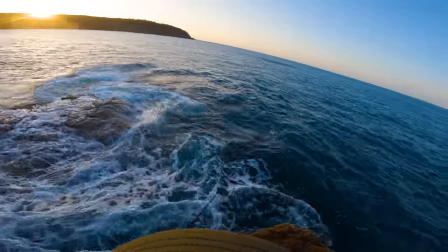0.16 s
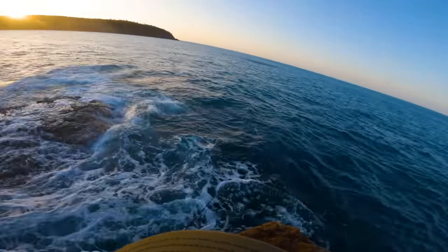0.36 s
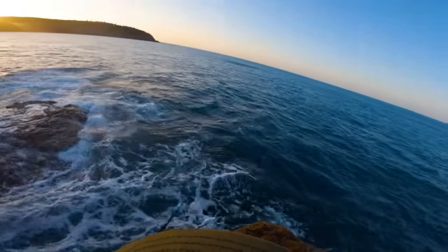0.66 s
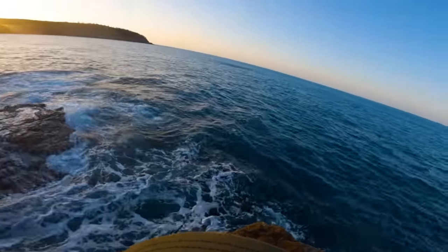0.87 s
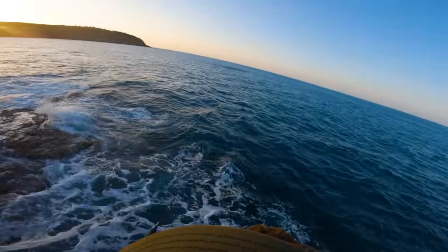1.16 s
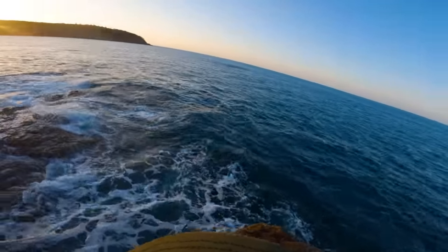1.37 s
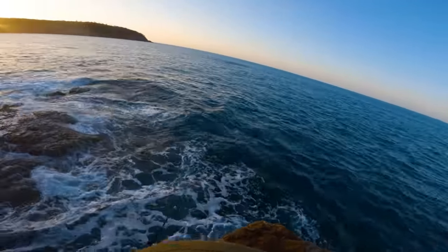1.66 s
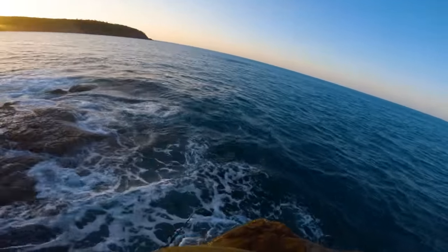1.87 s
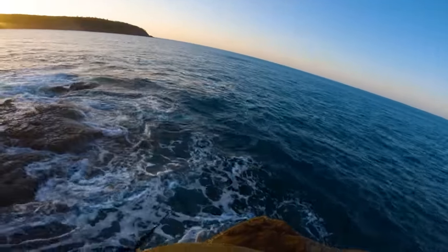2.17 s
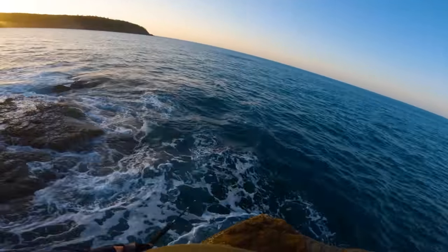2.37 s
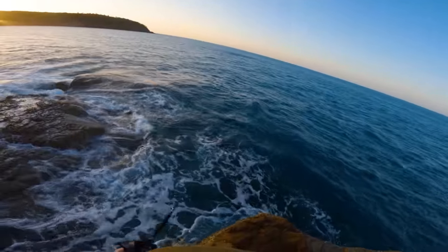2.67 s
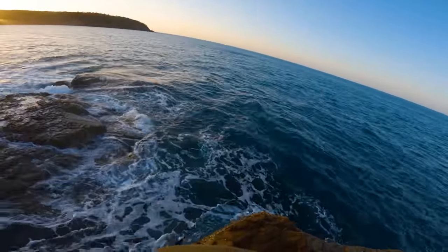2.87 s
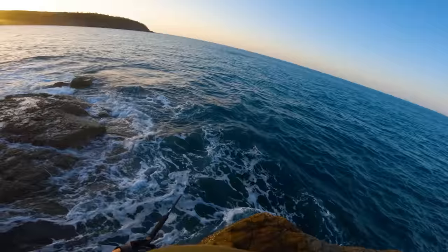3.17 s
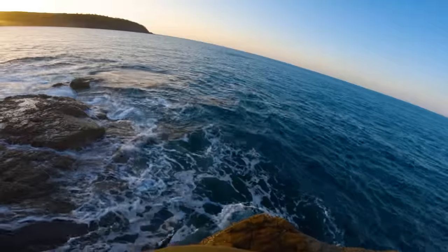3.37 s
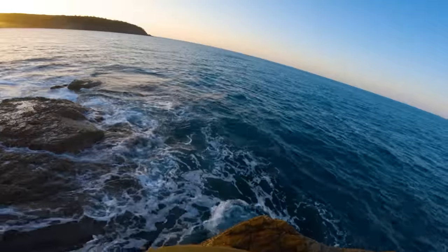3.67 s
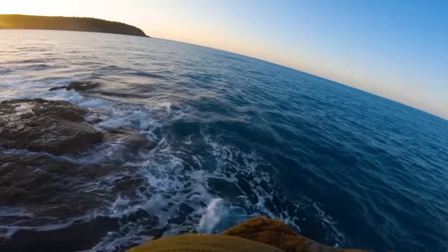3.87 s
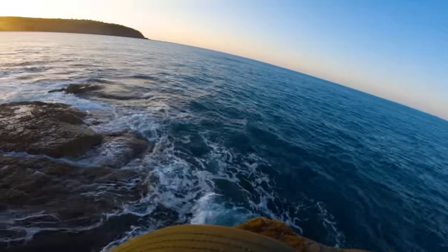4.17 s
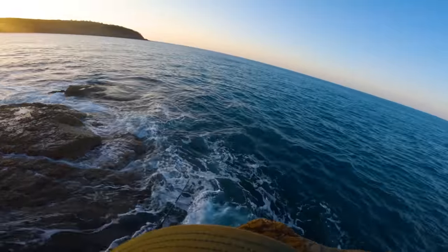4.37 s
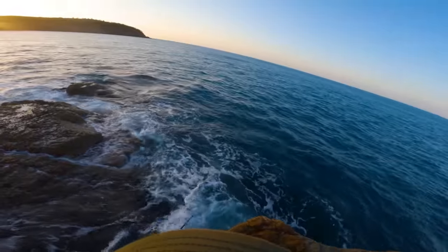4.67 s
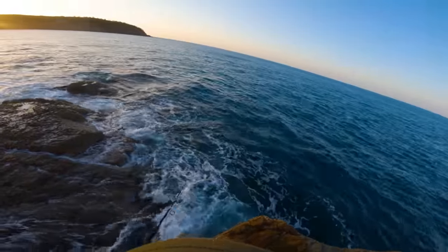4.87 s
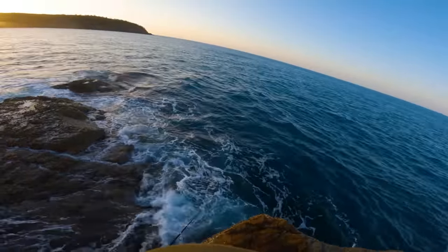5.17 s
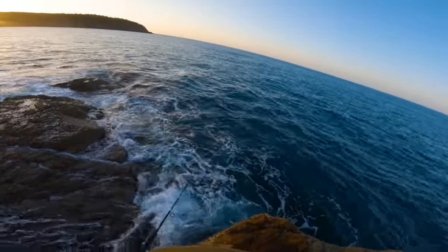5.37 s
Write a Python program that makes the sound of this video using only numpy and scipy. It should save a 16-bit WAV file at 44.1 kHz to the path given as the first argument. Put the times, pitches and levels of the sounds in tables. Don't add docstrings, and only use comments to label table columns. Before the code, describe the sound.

Open rocky seashore, heard from a small covered microphone close to the water. Throughout, wind makes a deep, uneven rumble with soft fluttering thuds, strong around 0.7, 1.6, 2.5 and 4.6 seconds. From 0 to 1.4 seconds a lively wave tumbles over the ledge: a mid-toned watery roar, hollow plopping gurgles as air pockets close, notably near 0.2, 0.6 and 1.4, and dense fizzing foam. Between 1.5 and 3.5 seconds the water recedes to a thinner wash; small bright drops tick close by around 1.7 to 2.0 and once at 2.8, and gusts stand out. From about 3.8 the wave builds again, gurgles crowding in, with a surge near 4.6. The foam thickens after 5 seconds, with the biggest bubbling gulp near 5.2, staying lively until the cut at 5.5. A smooth, deep roar of distant shoreline lies behind, strongest at the start.

```python
import sys
import numpy as np
from scipy import signal
from scipy.fft import rfft, irfft
from scipy.io import wavfile
from scipy.ndimage import uniform_filter1d

SR = 44100
rng = np.random.default_rng(int(sys.argv[2]) if len(sys.argv) > 2 else 0)


def pcm_store(signal):
    levels = np.round(np.clip(np.atleast_2d(signal), -1, 1) * 32767)
    wavfile.write(sys.argv[1], SR, levels.astype(np.int16).T)


def makeup_ratio(level_db):
    decades = np.asarray(level_db, float) / 20
    return 10 ** decades


N = 242991
FREQS = np.maximum(np.arange(N // 2 + 1) * SR / N, 1)


def rms_one(x):
    return x / np.sqrt(np.mean(x ** 2) + 1e-20)


def in_time(rows):
    s, *columns = np.transpose(rows)
    return [np.interp(np.arange(N) / SR, s, c) for c in columns]


def colour(points):
    hz, level_db = np.transpose(points)
    return makeup_ratio(np.interp(np.log(FREQS), np.log(hz), level_db, left=-200, right=-200))


def drift(rate):
    r = np.exp(-80 * np.pi * rate / SR)
    noise = rng.standard_normal(N // 40 + 2002)
    slow = signal.lfilter([1], [1, -2 * r, r * r], noise)[2000:]
    return np.interp(np.arange(N) / 40, np.arange(len(slow)), rms_one(slow))


def bursts(per_s, spread_db):
    sizes = makeup_ratio(spread_db * np.minimum(rng.exponential(1, N), 4))
    signed = sizes * rng.choice([-1, 1], N)
    return rms_one(signed * (rng.random(N) < per_s / SR))


def lifts(times, lifts_db, lengths):
    t = np.arange(0, N + 64, 64) / SR
    bells = np.exp(-((t[:, None] - times) / lengths) ** 2) @ lifts_db
    return np.interp(np.arange(N) / SR, t, bells)


def patchy(x, points, shared_db, own_db, rate):
    spectrum, together, out = rfft(x) * colour(points), drift(rate), 0
    steps = 2 * np.log2(FREQS)
    first, last = int(2 * np.log2(points[0][0])), int(2 * np.log2(points[-1][0])) + 1
    for k in range(first, last + 1):
        band = irfft(spectrum * np.clip(1 - abs(steps - k), 0, 1), N)
        out = out + band * makeup_ratio(shared_db * together + own_db * drift(rate))
    return rms_one(out)


def wind():
    # [t/s, level/dB]
    wind_strength = [(0.0, -27.5), (0.04, -38), (0.09, -26), (0.5, -21.5), (0.75, -21.5), (1.1, -23.5),
                     (1.45, -22.5), (1.8, -23), (2.1, -21), (2.6, -22), (3.1, -23), (3.6, -20.5),
                     (4.25, -24.5), (4.6, -18.5), (4.8, -27), (5.05, -21.5), (5.3, -25.5), (5.51, -25.5)]
    # [f/Hz, level/dB]
    eddy_tone = [(8, -23), (14, 11), (30, 13), (65, 3), (100, -3.5), (135, -7.5), (160, -17), (220, -24),
                 (320, -41.5)]
    # [f/Hz, level under the strength/dB, flutter/dB]
    eddy_sizes = [
        (35, -4, 1.7),
        (70, -3.5, 1.9),
        (125, -8, 2.85),
    ]
    # [t/s, lift/dB, f/Hz]
    gust_events = [(.08, 8.5, 125), (.24, 2, 125), (.3, 5, 35), (.56, 1, 70), (.7, 4, 35), (.72, 5, 125),
                   (.87, 7, 70), (1.18, 5.5, 70), (1.51, 3.5, 125), (1.58, 12, 48.6), (1.73, 5, 125),
                   (1.8, 6.5, 35), (1.96, 3, 110), (2.18, 3, 35), (2.25, 5.5, 80), (2.5, 7, 115),
                   (2.58, 4, 35), (2.79, 5.5, 75), (2.99, 2.5, 75), (3.1, 7, 35), (3.29, 2, 125),
                   (3.4, 5, 45), (3.65, 4, 120), (3.88, 3.5, 125), (3.99, 8, 85), (4.17, 6, 35),
                   (4.21, 6, 70), (4.57, 0.5, 60), (5.08, 1.5, 35), (5.41, 6.5, 81.5)]
    gust_s, gust_octaves, flutter_per_s = 0.051, 0.57, 7.2

    spectrum, out = rfft(rng.standard_normal(N)) * colour(eddy_tone), 0
    over_low, over_high = [1 / (1 + (hz / FREQS) ** 10) for hz in (50, 95)]
    shares = (1 - over_low, over_low - over_high, over_high)
    strength_db, = in_time(wind_strength)
    s, lift_db, gust_hz = np.transpose(gust_events)
    for share, (hz, under_db, flutter_db) in zip(shares, eddy_sizes):
        eddies = rms_one(irfft(spectrum * share, N))
        loudness = uniform_filter1d(uniform_filter1d(eddies ** 2, size=2500), size=2500)
        evened = rms_one(eddies / (loudness + 0.054) ** 0.67)
        nearness = np.exp(-(np.log2(gust_hz / hz) / gust_octaves) ** 2)
        gusts_db = lifts(s, lift_db * nearness, gust_s)
        level_db = strength_db + under_db + gusts_db + flutter_db * drift(flutter_per_s)
        out = out + makeup_ratio(level_db) * evened
    return out


def gurgle(per_s, cycles):
    clicks = bursts(per_s * makeup_ratio(3.0 * drift(7)), spread_db=3.0)
    dealt, out = rng.integers(0, 24, N), 0
    for k, hz in enumerate(np.geomspace(420, 1600, num=24)):
        r, w = makeup_ratio(-60 * hz / (cycles * SR)), 2 * np.pi * hz / SR
        struck = clicks * (dealt == k) + 1e-18
        ringing = signal.lfilter([0, 1], [1, -2 * r * np.cos(w), r * r], struck)
        out = out + rms_one(ringing) * np.sqrt(hz)
    return rms_one(out)


def surge():
    # [f/Hz, level/dB]
    surge_tone = [(330, -22.5), (500, -4.5), (650, -3), (950, -4.5), (1300, -7.5), (1900, -14.5)]
    roar = patchy(rng.standard_normal(N), surge_tone, shared_db=0.55, own_db=0.5, rate=14.0)
    gurgles = patchy(gurgle(per_s=400, cycles=21), surge_tone, shared_db=2.2, own_db=4.1, rate=6.4)
    return rms_one(roar + makeup_ratio(-5.0) * gurgles)


def pockets(table, under_db, cycles):
    out, t = np.zeros(N + SR // 8), np.arange(SR // 8) / SR
    for s, peak_db, hz in table:
        age = t * hz / cycles
        shape = age * np.exp(1 - age)
        tone = np.sin(2 * np.pi * hz * t * (.97 + 0.0047 * age))
        out[round(s * SR):][:len(t)] += makeup_ratio(peak_db - under_db) * shape * tone
    return out[:N]


def splashes(layer_hz):
    # [t/s, lift/dB, length/s, f/Hz]
    splash_events = [(.11, 0, 0.065, 3500), (.69, 4, .05, 1200), (0.877, 3, .06, 450),
                     (0.905, 3, .04, 3000), (1.26, 2.5, 0.23, 1400), (1.675, 3, 0.036, 2000),
                     (1.76, 3.5, .04, 350), (1.894, 2.5, .03, 2000), (2.125, 0, 0.024, 2500),
                     (2.297, 3, .03, 1000), (2.6, -1, 0.03, 1600), (2.767, 6.5, 0.027, 300),
                     (2.82, 0, 0.035, 3000), (3.05, 3.5, 0.086, 250), (3.26, 3, 0.027, 300),
                     (3.437, 0.5, .04, 2500), (3.89, 2.5, 0.024, 600), (4.36, 1.5, 0.03, 900),
                     (4.51, 3, 0.022, 2000), (4.583, 2, 0.068, 900), (4.7, 0, .03, 2500),
                     (5.1, 1.5, .04, 3500), (5.192, 2, 0.12, 795), (5.277, 0.5, .03, 1500),
                     (5.31, -2, 0.033, 700), (5.46, 0.5, .04, 2000)]
    s, lift_db, length, hz = np.transpose(splash_events)
    nearness = np.exp(-(np.log2(hz / layer_hz) / 0.92) ** 2)
    return lifts(s, lift_db * nearness, length)


def wash():
    # [f/Hz, level/dB]
    wash_tone = [(700, -13.5), (1150, -5), (1600, -3.5), (2200, -2), (3000, -4), (3800, -9.5),
                 (5200, -20.5)]
    source = rng.standard_normal(N) + makeup_ratio(-4.0) * bursts(per_s=3000, spread_db=3.0)
    return patchy(source, wash_tone, shared_db=0.0, own_db=0.58, rate=5.6)


def foam():
    # [f/Hz, level/dB]
    foam_tone = [(2600, -7.5), (3900, -5), (5000, -3), (6200, -7), (7100, -9.5), (8000, -19), (9100, -26.5),
                 (10000, -23.5), (12000, -30), (13300, -40), (14300, -45), (14800, -80)]
    pops = bursts(per_s=2500 * makeup_ratio(3.9 * drift(29)), spread_db=7.5)
    source = rng.standard_normal(N) + makeup_ratio(-12.0) * pops
    return patchy(source, foam_tone, shared_db=0.36, own_db=0.5, rate=14.0)


def misty(x):
    # [t/s, lift/dB]
    mist_lift = [(0, 0.43), (.5, 1.8), (.8, .1), (2.5, 0.22), (4.3, -.3), (4.7, -1.6), (5.51, -1.2)]
    top = irfft(rfft(x) / (1 + (6500 / FREQS) ** 10), N)
    return x + (makeup_ratio(in_time(mist_lift)[0]) - 1) * top


def drops():
    # [t/s, peak level/dB, splash length/ms]
    drop_events = [
        (1.7194, -48, 1.5),
        (1.8687, -52, 1.5),
        (1.9214, -51, 1.5),
        (1.9739, -45, 1.5),
        (2.8105, -47, 1.5),
        (4.5194, -58, 1.5),
    ]
    out, ms = np.zeros(N), np.arange(SR // 10) * 1000 / SR
    sprays = rng.standard_normal((len(drop_events), len(ms)))
    for (s, peak_db, length), spray in zip(drop_events, sprays):
        tick = ms / .7 * np.exp(1 - ms / .7)
        tail = .4 * np.exp(-ms / (6 * length))
        out[round(s * SR):][:len(ms)] += makeup_ratio(peak_db - 4.0) * spray * (tick + tail)
    bright = signal.butter(3, [6800, 11500], "band", fs=SR, output="sos")
    return signal.sosfilt(bright, out + 1e-18)


def swell():
    # [f/Hz, level/dB]
    swell_tone = [(120, -2), (175, -0.5), (240, -1), (330, -1.5), (460, -3.5), (650, -16.5)]
    return patchy(rng.standard_normal(N), swell_tone, shared_db=1.46, own_db=0.63, rate=1.7)


def scene():
    # [t/s, level/dB]
    wave_vigour = [(0, -30.5), (.3, -31.5), (.55, -32), (.75, -31.5), (1.0, -33), (1.4, -36), (1.9, -36.5),
                   (2.3, -38.5), (2.55, -41), (3.1, -38.5), (3.6, -39.5), (3.95, -36.5), (4.3, -34),
                   (4.57, -31), (4.8, -34), (5.0, -33), (5.24, -29.5), (5.51, -30.5)]
    # [t/s, level/dB]
    froth_thickness = [(0.0, -34.5), (0.09, -33), (0.61, -38), (0.64, -37), (0.78, -38), (0.9, -38.5),
                       (1.03, -39.5), (1.41, -39.5), (1.49, -35), (1.76, -39), (2.75, -41.5), (2.84, -39),
                       (4.14, -39), (4.5, -36.5), (4.88, -36.5), (5.08, -33.5), (5.48, -32.5), (5.51, -33)]
    # [t/s, level/dB]
    shore_level = [(0, -27.5), (.2, -30.5), (.5, -29.5), (.9, -30), (1.3, -32.5), (1.75, -37.5), (2.1, -36),
                   (2.55, -37.5), (2.8, -39), (3.1, -34.5), (3.4, -32.5), (3.7, -36), (4.0, -36),
                   (4.3, -34.5), (4.6, -34.5), (4.9, -34.5), (5.2, -33), (5.51, -33.5)]
    # [t/s, peak level/dB, f/Hz]
    large_pockets = [(0.209, -10, 580), (0.307, -14, 1130), (0.413, -22, 660), (0.517, -28, 820),
                     (0.633, -8.5, 635), (0.736, -22, 820), (0.853, -18, 624), (1.068, -24.5, 802),
                     (1.177, -36, 734), (1.422, -12.5, 910), (3.811, -20, 727), (3.977, -12, 830),
                     (4.072, -20, 590), (4.227, -21, 660), (4.294, -20, 740), (4.396, -11, 724),
                     (4.533, -14, 883), (4.724, -21, 890), (4.793, -22, 656), (4.858, -13, 861),
                     (4.933, -24, 840), (4.991, -20, 710), (5.19, -6, 708), (5.319, -13, 682),
                     (5.375, -10, 710), (5.487, -10, 840)]
    # [t/s, peak level/dB, f/Hz]
    small_pockets = [(0.0894, -18, 1345), (0.1764, -18, 1160), (0.6697, -26, 1020), (1.019, -19, 1240),
                     (1.1053, -22.5, 1160), (1.679, -17, 1250), (1.8794, -33, 1040), (1.8994, -30, 1250),
                     (2.105, -22, 2500), (2.1544, -33, 1320), (2.2244, -24, 1290), (2.2844, -24, 1316),
                     (3.1294, -28, 1290), (3.3897, -25, 2430), (4.3176, -16, 1160), (4.399, -20, 1240),
                     (4.4847, -19, 1062), (4.6137, -24, 1040), (4.899, -30, 1080), (5.029, -15, 1045),
                     (5.2674, -15, 1430), (5.3625, -23, 1090)]

    wave, froth = [c - c.mean() for c in in_time(wave_vigour) + in_time(froth_thickness)]
    surge_db = -33.5 + 1.12 * wave + splashes(800)
    wash_db = -36 + 0.15 * wave + 0.82 * froth + splashes(2400)
    foam_db = -45.5 + 0.94 * froth + splashes(5000)
    shore_db = in_time(shore_level)[0] + splashes(260)
    sea = makeup_ratio(surge_db) * surge() + makeup_ratio(wash_db) * wash() + makeup_ratio(foam_db) * misty(foam())
    sea = sea + makeup_ratio(shore_db) * swell()
    bubbles = pockets(large_pockets, under_db=15.5, cycles=3.5)
    bubbles = bubbles + pockets(small_pockets, under_db=13.5, cycles=7.7)
    return (wind() + sea + bubbles + drops())[None]


def top_cut(x):
    return signal.sosfilt(signal.butter(12, 14300, fs=SR, output="sos"), x)


def record(dry):
    to_nearest_end = np.minimum(np.arange(N), np.arange(N)[::-1])
    fade = np.minimum(to_nearest_end / 60, 1) * .8 + .2
    rounded = 0.62 * np.tanh(dry / 0.59) * fade
    return top_cut(rounded)


dry = scene()
out = record(dry)
pcm_store(out)
```